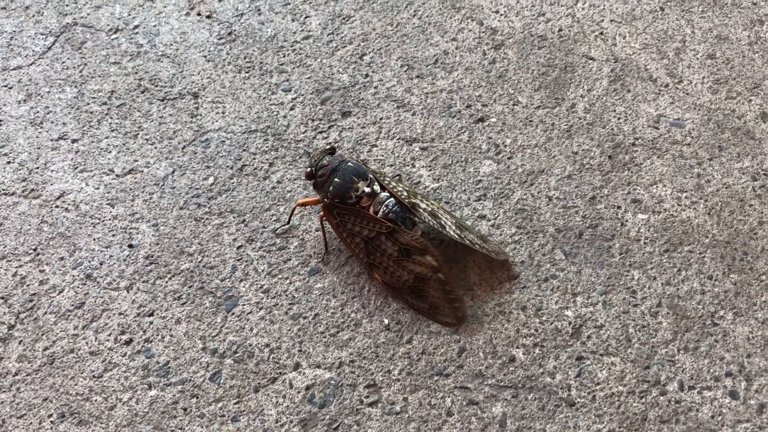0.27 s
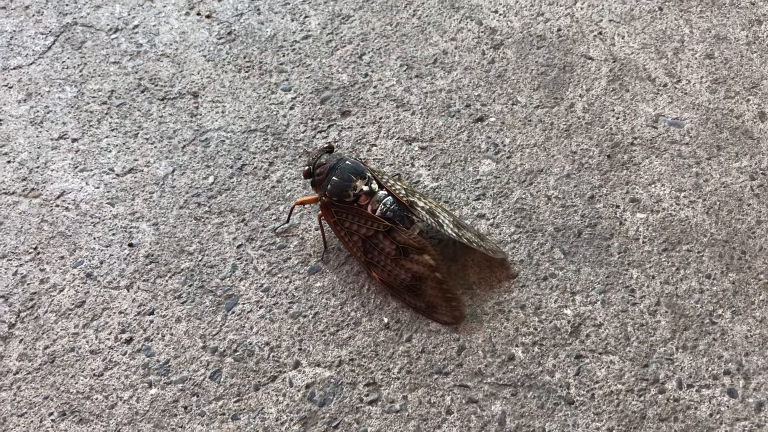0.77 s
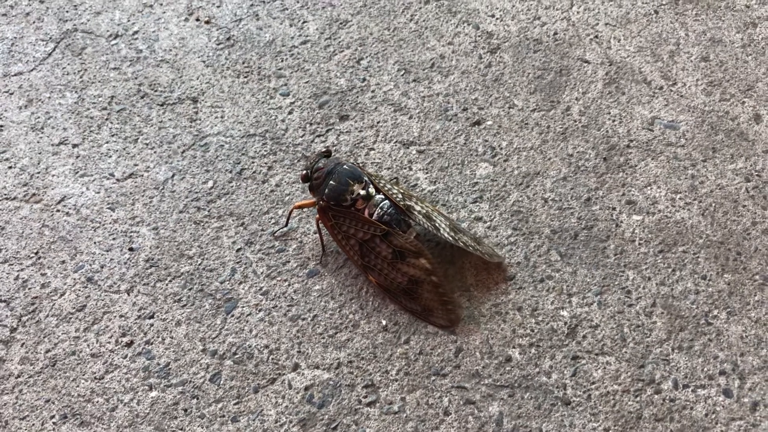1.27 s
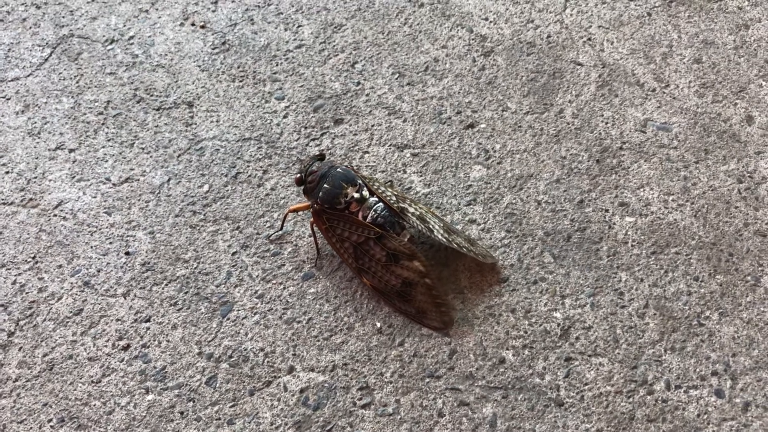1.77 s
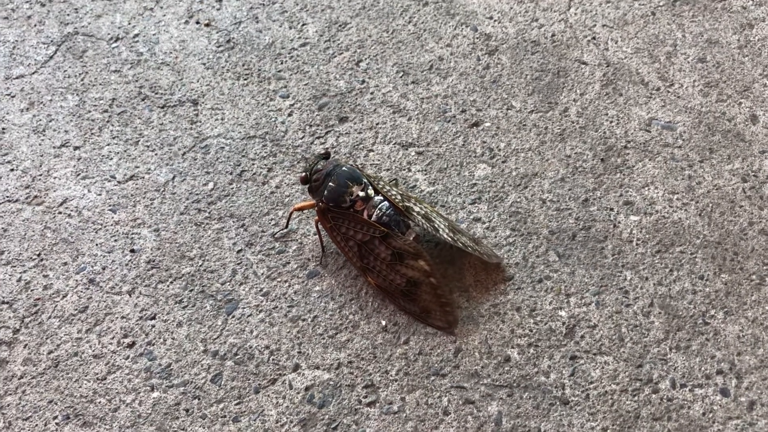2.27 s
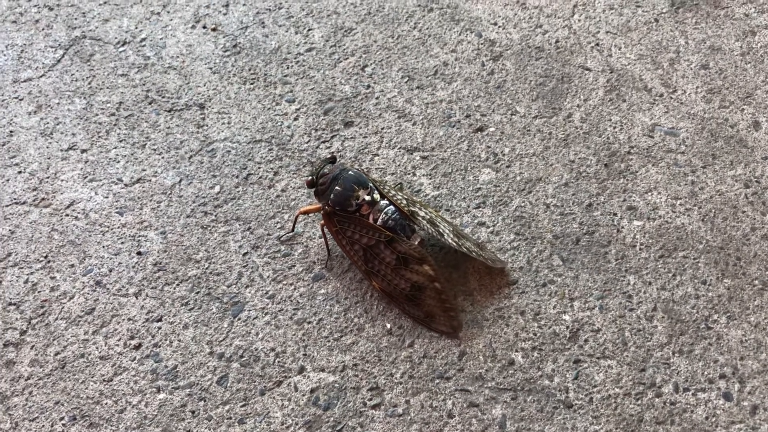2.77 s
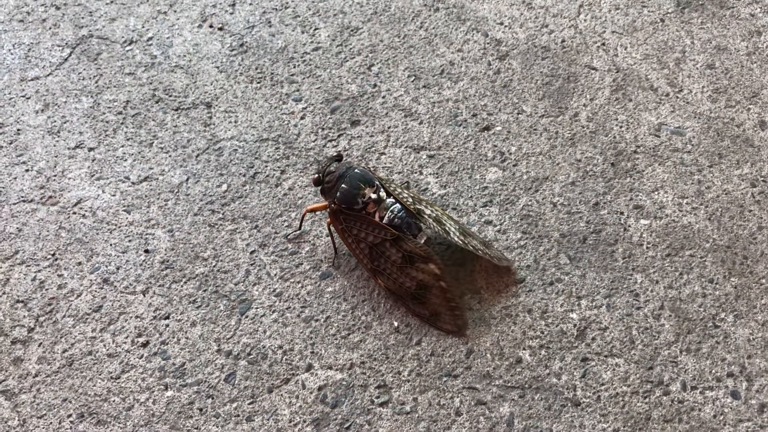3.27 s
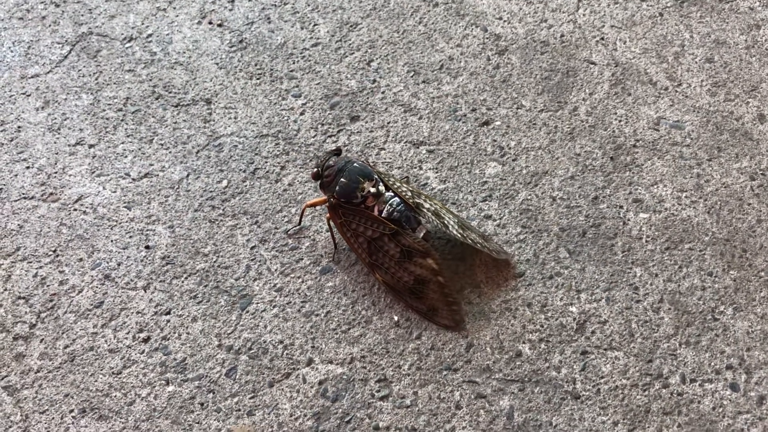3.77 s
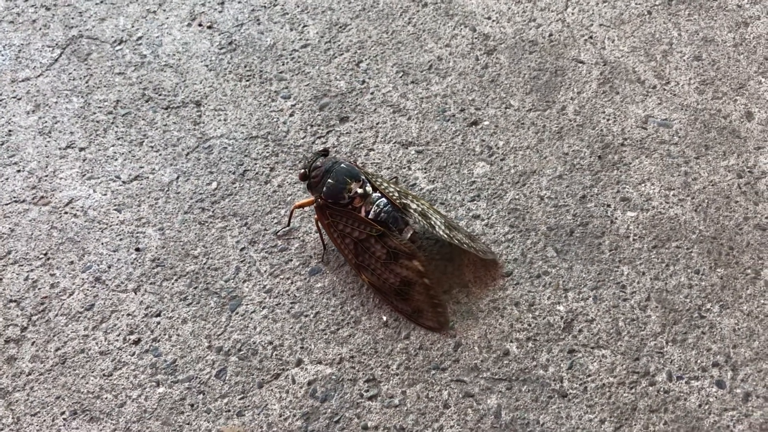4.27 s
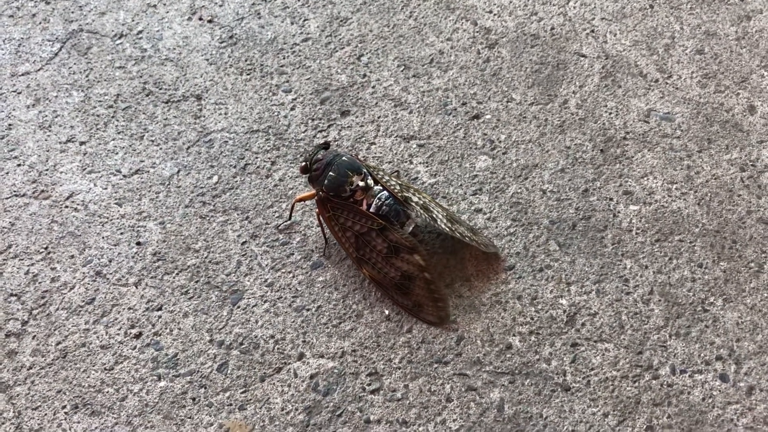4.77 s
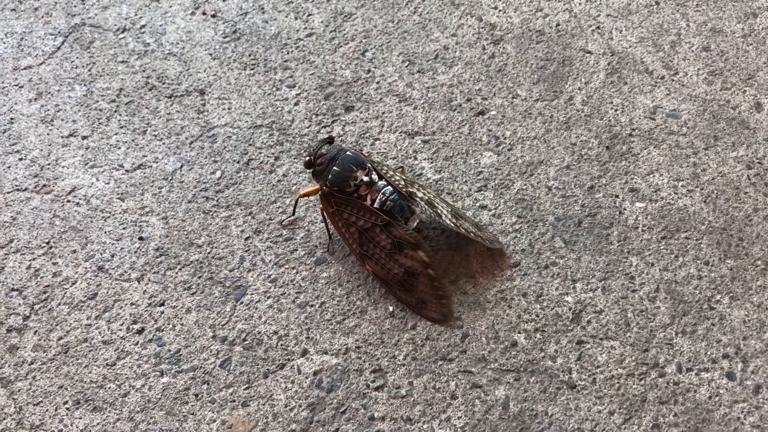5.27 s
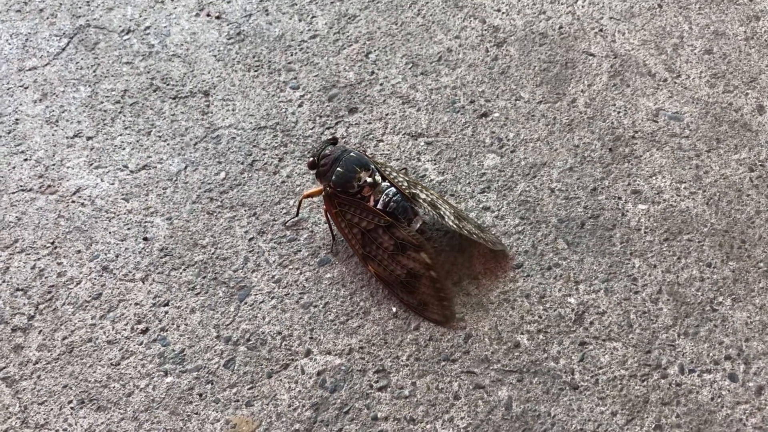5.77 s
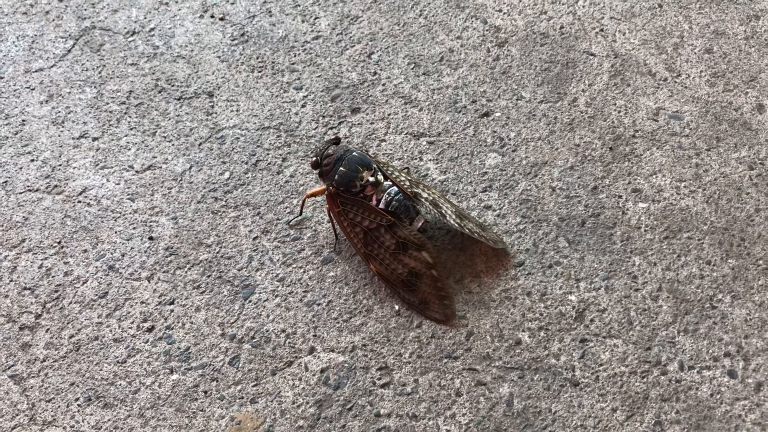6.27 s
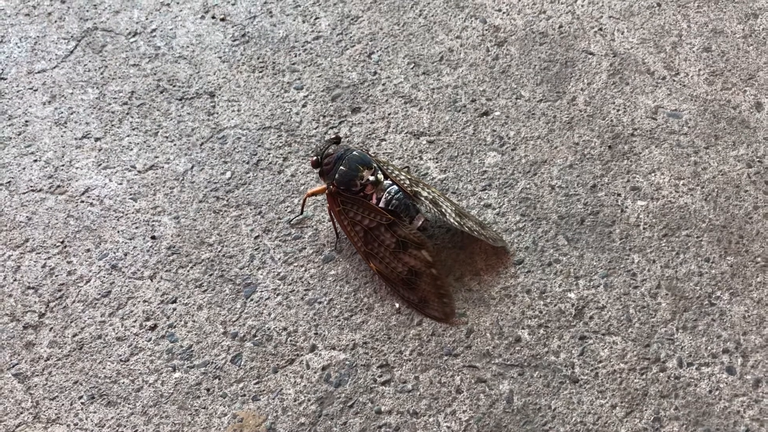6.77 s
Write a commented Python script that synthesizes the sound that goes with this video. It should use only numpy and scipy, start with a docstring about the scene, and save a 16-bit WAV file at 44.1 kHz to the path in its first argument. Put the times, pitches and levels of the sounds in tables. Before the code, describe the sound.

Harsh, continuous cicada song, made of rapid clicks ringing bright and metallic, shimmers about fifteen times a second over a barely audible low outdoor rumble.

```python
"""A cicada sings on a concrete path, close by, over a faint outdoor rumble and a low hum.
Its two tymbals (drum skins) buckle in turn, and each click rings the hollow body through its resonances.
The song speeds up and tightens; some 15 times a second the abdomen lifts, ever further,
and sweeps the ring up to a sizzle. Even hiss and a faint thrum go with it.
The rumble is shaped noise; the hum is a handful of wavering sine tones."""
import sys
import numpy as np
from scipy.fft import rfft, irfft, next_fast_len
from scipy.io import wavfile
from scipy.ndimage import uniform_filter1d, minimum_filter1d, map_coordinates

SR = 44100
rng = np.random.default_rng(int(sys.argv[2]) if len(sys.argv) > 2 else 0)


def dump(signal):
    """Clip the signal to [-1, 1] and save it as 16-bit WAV at the path in sys.argv[1]."""
    limited = np.clip(np.atleast_2d(signal).T, -1, 1)
    pcm = np.round(limited * 32767).astype(np.int16)
    wavfile.write(sys.argv[1], SR, pcm)


N = 309582  # length in samples


def amp(db):
    """Turn decibels into a gain."""
    return 10 ** (np.asarray(db) / 20)


def unit(x):
    """Scale x to an average strength (rms) of 1."""
    return x / np.sqrt(np.mean(x ** 2) + 1e-20)


def curves(rows, t):
    """Read each column after the first at the times t, with straight lines between rows."""
    s, *columns = np.transpose(rows)
    return [np.interp(t, s, column) for column in columns]


def along(points, hz):
    """Read (frequency, value) points at hz, with straight lines on a logarithmic frequency axis."""
    f, value = np.transpose(points)
    return np.interp(np.log(hz + 1), np.log(f), value)


def wobble(rate):
    """Draw a smooth random curve through `rate` random points a second."""
    points = rng.standard_normal(int(N * rate / SR) + 4)
    return map_coordinates(points, [np.arange(N) * rate / SR])


def filtered(x, response):
    """Multiply the spectrum of x by a gain that depends on frequency."""
    padded = next_fast_len(N + SR // 2)
    hz = np.fft.rfftfreq(padded, 1 / SR)
    return irfft(rfft(x, padded) * response(hz), padded)[:N]


def noise(spectrum):
    """Shape white noise to this spectrum, at rms 1."""
    white = rng.standard_normal(N)
    return unit(filtered(white, lambda hz: amp(along(spectrum, hz))))


def causal(gain):
    """Give these gains the phases of a body that rings only after the blow (minimum phase)."""
    cepstrum = irfft(np.log(gain + 1e-6))
    half = cepstrum.shape[1] // 2
    # fold the half before the blow onto the half after it
    cepstrum[:, 1:half] *= 2
    cepstrum[:, half + 1:] = 0
    return np.exp(rfft(cepstrum))


def slackness(t):
    """The body draws taut as the song goes on (1 slack, 0 taut)."""
    half_taut_s, steepness = 2.88, 3.44
    return 1 / (1 + (t / half_taut_s) ** steepness)


def abdomen(t):
    """Each throb lifts, holds and drops the abdomen; returns its stroke (0-1) and the lift it gives."""
    # the throbs slow down while their swing grows, then pick up again: t/s, rate/(throbs a second)
    throb_rate = [(0, 16.9), (.7, 15.88), (1.3, 15.95), (1.6, 15.09), (2.5, 14.88), (3.3, 14.3),
                  (4.3, 14.73), (5.2, 15.19), (7, 16.02)]
    # how far a throb lifts the abdomen: t/s, lift/(0-1)
    reach_points = [(0, .13), (.7, .19), (1.7, .35), (2.65, .61), (3.1, .87), (5, 0.98)]
    first_turn = .39  # share of a throb already gone by at the start
    wait, rise, hold, fall = .09, .43, .08, .23  # stages of one throb, as shares of its length
    linger_from_s, linger_per_s = 3.3, .035  # near full stretch the hold grows, in shares of a throb
    limp, scatter = .03, .035  # every other throb lifts further; each also differs by chance

    rate, = curves(throb_rate, t)
    turns = first_turn + np.cumsum(rate) / SR
    throb = turns.astype(int)
    progress = turns % 1
    # the extra hold is shared between both sides
    linger = linger_per_s * np.maximum(t - linger_from_s, 0) / 2
    rising = (progress - wait + linger) / rise
    falling = (wait + rise + hold + fall + linger - progress) / fall
    stroke = np.clip(np.minimum(rising, falling), 0, 1)

    reach, = curves(reach_points, t)
    chance = rng.standard_normal(throb[-1] + 1)[throb]
    uneven = limp * (-1) ** throb + scatter * chance
    # throbs are most uneven at half reach, and steady at full stretch
    freedom = 2 * np.sqrt(np.maximum(reach * (1 - reach), 0))
    return stroke, np.clip(stroke * (reach + freedom * uneven), 0, 1)


def click_rate(t, stroke, lift):
    """Clicks a second: warming up, faster within each throb, with a spurt as the abdomen drops."""
    cruise_hz, creep_hz_per_s = 381.6, .5
    start_lag_hz, warm_up_s, warm_up_shape = 73.6, .91, 1.24
    swing_hz, swing_fade_s, swing_shape = 26.8, 1.53, 1.2  # a throb hurries the clicks ever less
    spurt_clicks = .32  # extra clicks gained over one full drop

    lag = start_lag_hz * np.exp(-(t / warm_up_s) ** warm_up_shape)
    rest_rate = cruise_hz + creep_hz_per_s * t - lag
    swing = swing_hz * np.exp(-(t / swing_fade_s) ** swing_shape)
    lift_speed = np.gradient(uniform_filter1d(lift, SR // 200)) * SR
    drop_speed = np.maximum(-lift_speed, 0)
    return rest_rate + swing * stroke + spurt_clicks * drop_speed


def body(hz, lift, slack, skirt=1.773, scatter_db=0.8, detune=.003):
    """One gain curve per click: the hollow body's resonances glide from posture to posture."""
    # body resonances in four postures: f/Hz, width/Hz, level/dB
    slack_modes = [(2500, 585, -26.5), (4710, 483, -3), (5293, 330, 2), (6026, 416, 4),
                   (11650, 1640, -15.5), (11800, 960, -14), (15100, 1500, -22.5)]
    rest_modes = [(3086, 553, -16.5), (5460, 265, 4.5), (5390, 440, 3), (6010, 396, 7), (11730, 930, -10.5),
                  (12000, 820, -16), (15100, 1000, -37)]
    half_modes = [(2958, 435, -14.5), (5450, 447, -1.5), (5870, 395, -2), (6935, 540, 2.5),
                  (12370, 1150, -8.5), (14630, 1240, 2), (15300, 1700, -26)]
    raised_modes = [(2894, 700, -20), (5358, 240, -2), (6970, 1550, -8.5), (8770, 1100, -22.5),
                    (12180, 760, -11.5), (15600, 1800, 4), (15300, 2900, -24)]

    at_rest = np.maximum(1 - 2 * lift, 0)
    half_way = 1 - abs(2 * lift - 1)
    raised = np.maximum(2 * lift - 1, 0)
    weights = np.transpose([at_rest, half_way, raised])
    modes = np.tensordot(weights, [rest_modes, half_modes, raised_modes], 1)
    # a slack body shifts the resonances, until the lift draws it taut
    slack_share = slack * (1 - lift ** 2)
    modes = modes + slack_share[:, None, None] * np.subtract(slack_modes, rest_modes)
    power = 0
    for centre, width, db in modes.transpose(1, 2, 0)[..., None]:
        # each click tunes and weighs each resonance a little differently
        off, strength = rng.standard_normal((2, len(lift), 1))
        distance = (hz - centre * (1 + detune * off)) / width
        gain = amp(db + scatter_db * strength) / (1 + distance ** 2) ** skirt
        power = power + gain ** 2
    return np.sqrt(power)


def buckle(hz, rough, crinkle_ms=5.4):
    """Spectra of the snaps: ribs give way and spread the pitches in time; a crinkle trails off."""
    # how late each pitch comes after the snap begins: f/Hz, delay/ms
    glide = [(4500, 0.054), (5400, 0.13), (6300, 0.099), (7500, 0.4), (11000, 0.12), (13000, 0.11),
             (14500, 0.88), (16000, 0.64)]
    # how much of a clean click's power is irregular: f/Hz, share/(0-1)
    irregular = [(2000, 0.033), (6200, 0.063), (7500, 0.036), (9000, 0.9), (12000, 0.16), (14000, 0.098),
                 (16000, 0.17)]

    size = 2 * (len(hz) - 1)
    delay_s = along(glide, hz) / 10 ** 3
    # adding up the delays over frequency gives the phase
    snap = np.exp(-2j * np.pi * np.cumsum(delay_s) * hz[1])
    fade = np.exp(-np.arange(size) / SR * 10 ** 3 / crinkle_ms)
    grains = rng.standard_normal((len(rough), size))
    crinkle = rfft(grains * fade / np.linalg.norm(fade))
    share = np.clip(along(irregular, hz) + rough[:, None], 0, 1)
    return snap * (np.sqrt(1 - share) + np.sqrt(share) * crinkle)


def tymbals(t, lift, beat, jitter_ms=0.0034, uneven_db=1.5, size=512):
    """Two tymbals click in turn, each click ringing the body as it is held just then."""
    # the tymbals briefly lose their clean snap: t/s, half length/s, roughness/(0-1)
    stumbles = [(.627, .012, .7), (.676, .016, .7), (3.39, .005, .4)]
    # the clicks swell as a slack abdomen opens, the low ring most: f/Hz, level for a full lift/dB
    swell = [(2300, 12.5), (3200, 5.5), (5500, 2), (14000, 5.5)]
    late_slack_ms, late_taut_ms = .028, .12  # lateness of the second tymbal

    # a click falls on each whole number of the beat
    count = np.arange(1, int(beat[-1]))
    when, second = np.interp(count, beat, t), count % 2
    slack = slackness(when)
    late_ms = late_taut_ms + slack * (late_slack_ms - late_taut_ms)
    slip = rng.standard_normal(len(when))
    when = when + (second * late_ms + slip * jitter_ms) / 10 ** 3
    rough = sum(share * np.exp(-((when - s) / half) ** 4) for s, half, share in stumbles)

    hz = np.fft.rfftfreq(size, 1 / SR)
    held = np.interp(when, t, lift)
    # how far the abdomen is lifted above its average over 52 clicks
    opening = slack * (held - uniform_filter1d(held, size=52))
    swelling = amp(opening[:, None] * along(swell, hz))
    ring = causal(body(hz, held, slack) * swelling) * buckle(hz, rough)
    # a fumbled snap hardly drives the middle resonances: f/Hz, level at full roughness/dB
    fumble_db = along([(3000, 0), (4500, -8), (5500, -8), (6400, 2)], hz)
    ring = ring * amp(rough[:, None] * fumble_db)

    # place each click in time, down to a fraction of a sample
    first, fraction = np.divmod(when * SR, 1)
    clicks = irfft(ring * np.exp(-2j * np.pi * hz * fraction[:, None] / SR))
    clicks = clicks * amp(uneven_db * second)[:, None]
    index = first.astype(int)[:, None] + np.arange(size)
    return np.bincount(index.ravel(), clicks.ravel(), N)[:N]


def cicada(t, hiss_db=-24, thrum_db=-55, slack_thrum_db=-5):
    """The ringing clicks, the even hiss of their scattered sound, and the faint thrum of the muscles."""
    # loudness of the song with its hiss: t/s, level/dB
    loudness = [(0.0, -13.5), (0.7, -14.5), (1.78, -14), (5.69, -16), (7.02, -16)]
    # shape of the hiss: f/Hz, relative level per Hz/dB
    hiss_shape = [(20, -49), (2000, -7.5), (4200, 9), (6000, 14), (7300, 19), (8400, 13), (9500, 19),
                  (10500, 8.5), (12000, -15), (13500, -10), (15800, -17)]

    stroke, lift = abdomen(t)
    beat = np.cumsum(click_rate(t, stroke, lift)) / SR
    song = unit(tymbals(t, lift, beat))
    # even out the level over half a second, so that the loudness table sets it
    song = song / np.sqrt(uniform_filter1d(song ** 2, SR // 2))
    song_db, = curves(loudness, t)
    hiss = amp(hiss_db) * noise(hiss_shape)
    # one thrum cycle per click, weaker in a slack body
    thrum = amp(thrum_db + slack_thrum_db * slackness(t)) * np.sin(2 * np.pi * beat)
    return amp(song_db) * (song + hiss) + thrum


def background(t, rumble_db=2, hum_db=46.5, waver=0.0119, flutter_db=3):
    """Distant rumble from shaped noise, and a low hum of sines that waver in pitch and level."""
    # common level of rumble and hum, before their own trims: t/s, level/dB
    air = [(0, -44), (2.5, -47.5), (4, -49.5), (7, -50.5)]
    # shape of the rumble: f/Hz, relative level per Hz/dB
    outdoors = [(12, -57), (20, -17.5), (70, -2.5), (130, -12), (198, -9.5), (236, -20), (346, -9),
                (499, -25), (572, -17.5), (707, -26), (778, -17.5), (857, -25), (1040, -19), (2000, -23),
                (2600, -22), (4400, -120)]
    # tones of the hum: f/Hz, relative level/dB
    tones = [(66.7, -50.5), (100.3, -53), (269.2, -62.5), (301.5, -59.5), (339.1, -58.5)]

    air_db, = curves(air, t)
    hum = 0
    for hz, db in tones:
        phase = 2 * np.pi * np.cumsum(hz * (1 + waver * wobble(12))) / SR
        level = np.sqrt(2) * amp(db + flutter_db * wobble(4.6))
        hum = hum + level * np.sin(phase)
    rumble = amp(rumble_db) * noise(outdoors)
    return amp(air_db) * (rumble + amp(hum_db) * hum)


def scene():
    """Add cicada and background; one microphone feeds both channels."""
    t = np.arange(N) / SR
    return np.tile(cicada(t) + background(t), (2, 1))


def record(dry, ceiling=0.74, top_hz=15830):
    """A limiter turns down the tallest peaks, then a filter cuts everything from top_hz up."""
    needed = np.minimum(1, ceiling / (abs(dry[0]) + 1e-9))
    # hold the lowest gain around each peak, then smooth the steps
    gain = uniform_filter1d(minimum_filter1d(needed, SR // 400), SR // 500)
    return np.array([filtered(channel * gain, lambda hz: hz < top_hz) for channel in dry])


dry = scene()
out = record(dry)
dump(out)
```